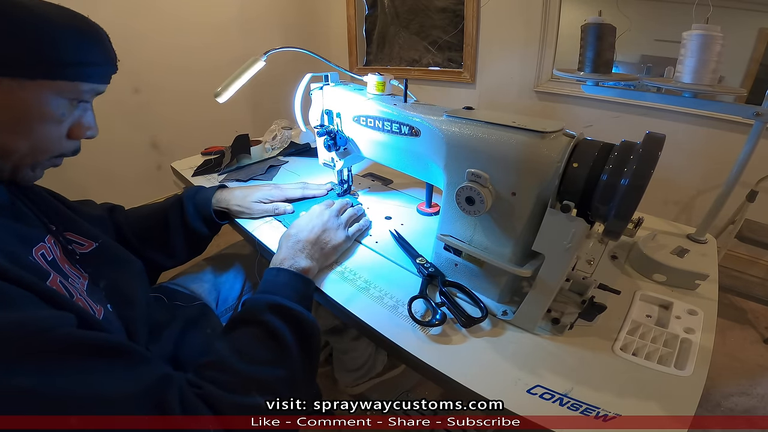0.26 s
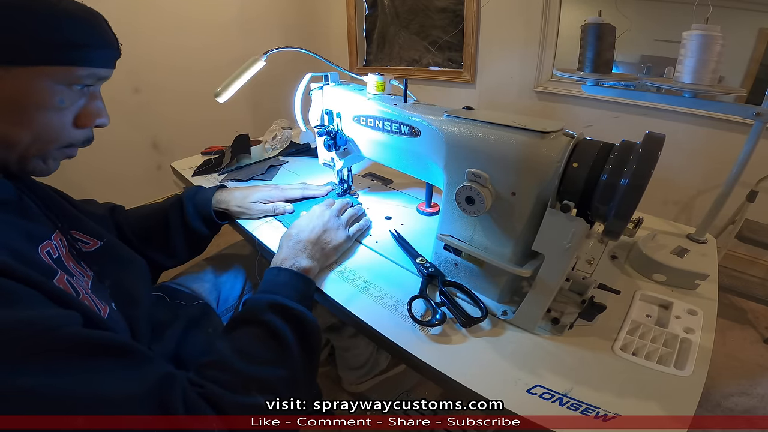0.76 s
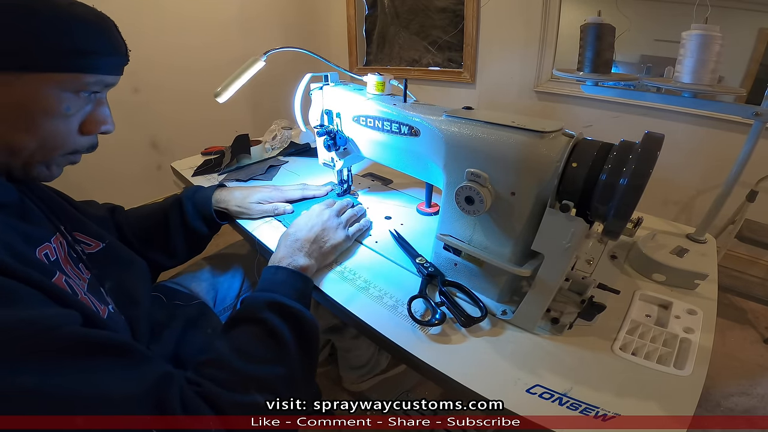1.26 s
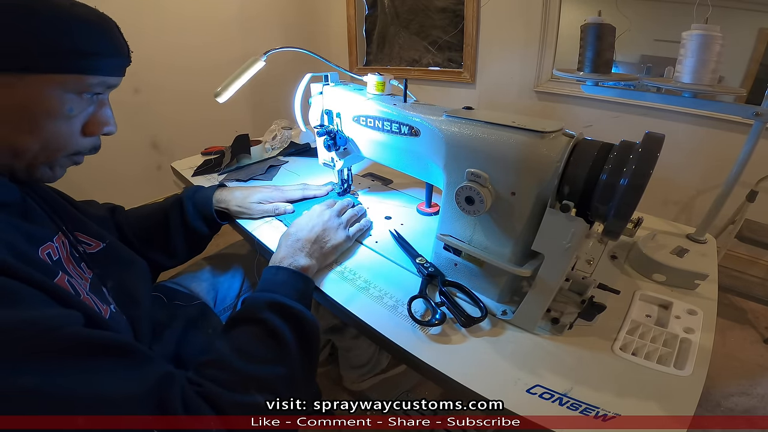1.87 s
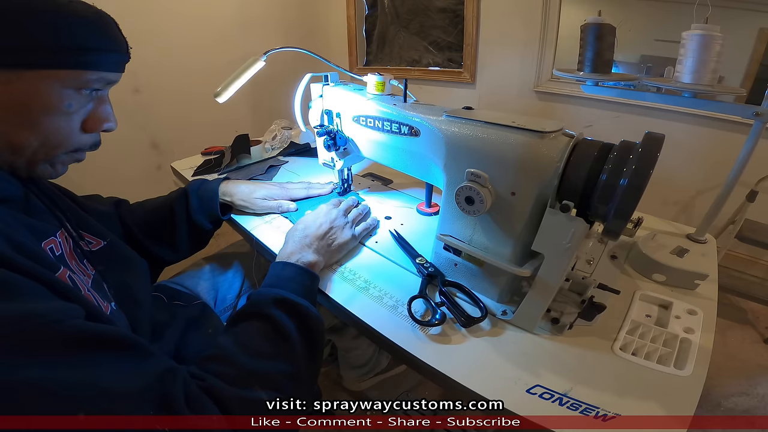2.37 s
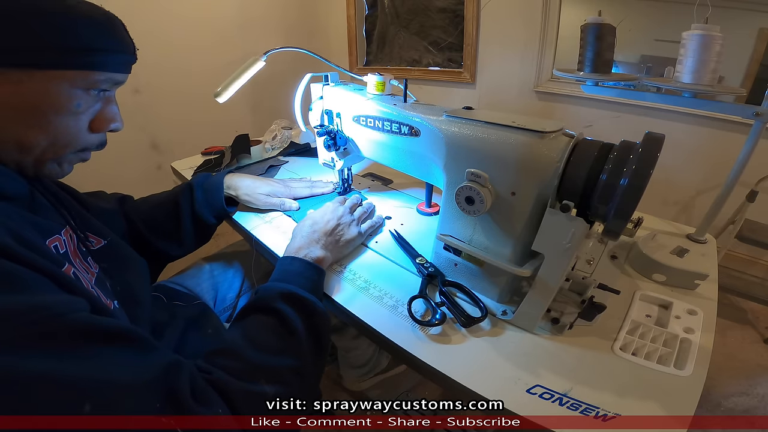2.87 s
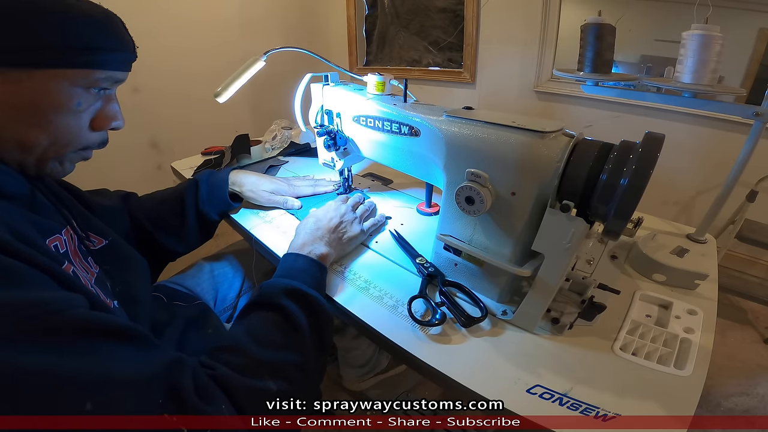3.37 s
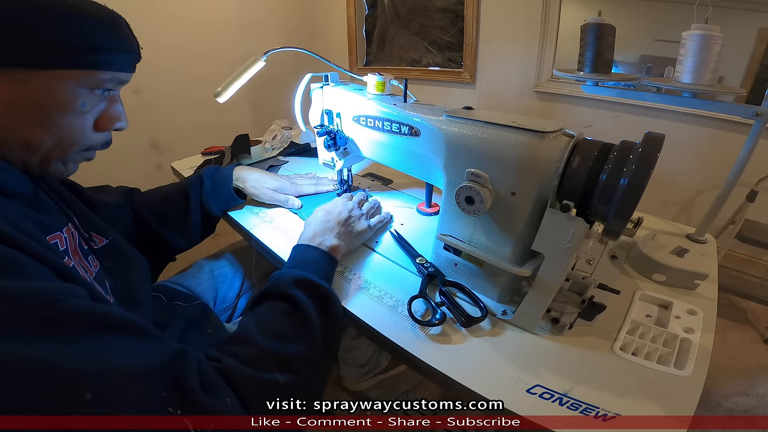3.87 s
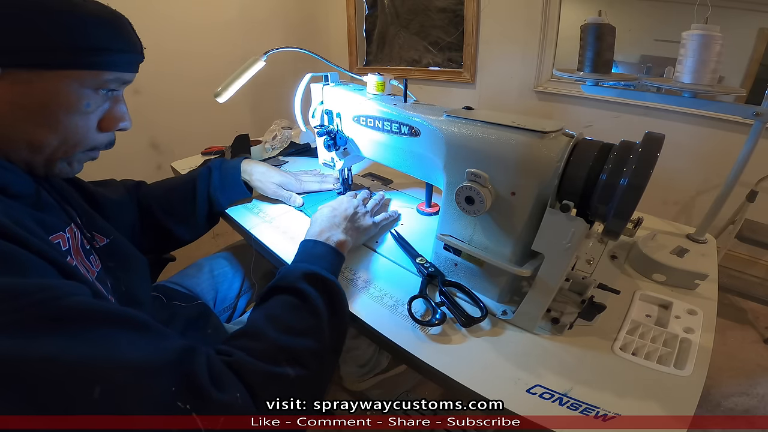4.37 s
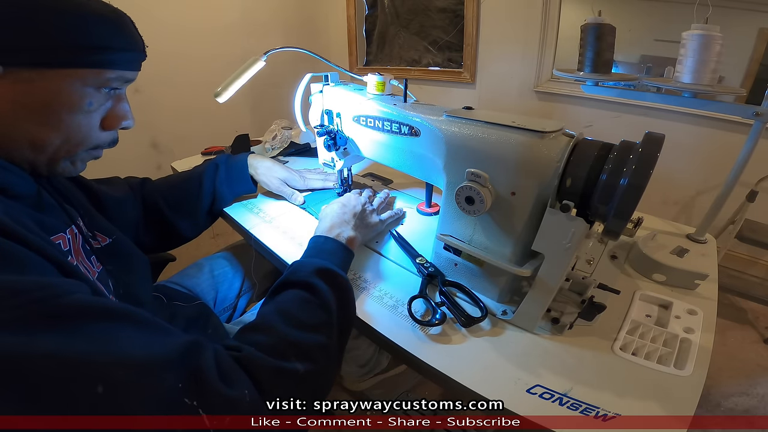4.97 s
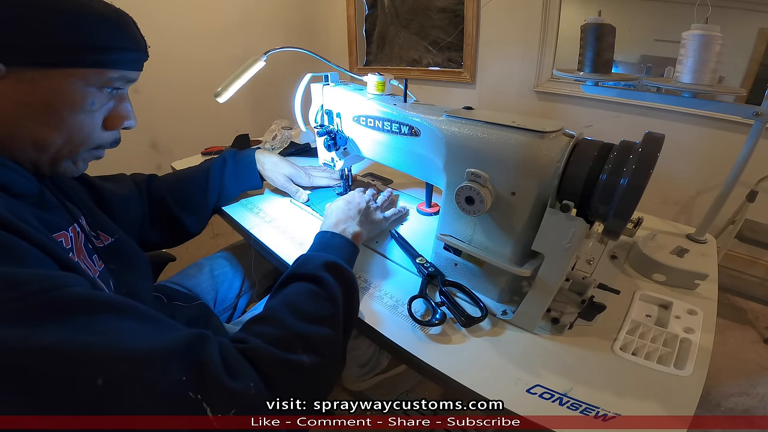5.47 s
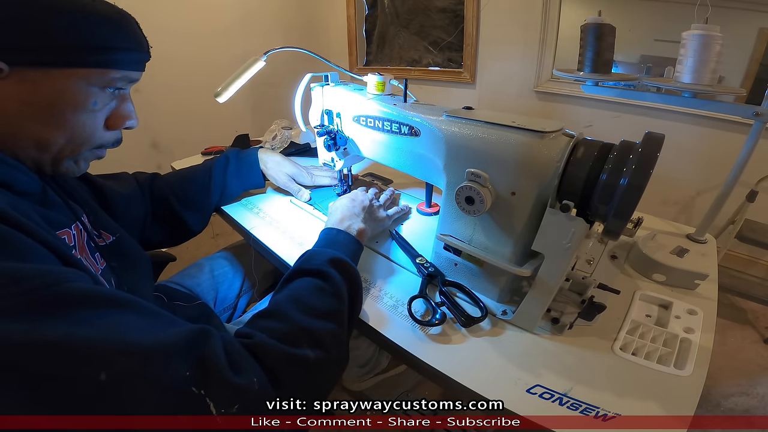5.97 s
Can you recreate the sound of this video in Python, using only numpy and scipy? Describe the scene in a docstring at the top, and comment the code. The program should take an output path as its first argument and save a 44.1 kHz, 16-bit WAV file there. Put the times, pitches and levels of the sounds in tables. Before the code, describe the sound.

Soft bumps and a metallic clack over a low motor hum, then an industrial sewing machine starts and clatters through twelve heavy, separate stitches.

```python
"""Industrial sewing machine

A walking-foot machine in a small room: the work is shifted with bumps, the presser foot drops with a clack,
then twelve stitches are sewn. Each turn of the shaft repeats its contacts: filtered noise bursts with decaying modes.
Coloured noise makes the whirr, the sliding cloth, the rocking stand and the low rumble.
A wavering sine makes the hum of the clutch motor, which drops in pitch as it takes up the load."""
import sys
import numpy as np
from scipy import signal
from scipy.fft import rfft, irfft, next_fast_len
from scipy.io import wavfile
from scipy.ndimage import uniform_filter1d, map_coordinates

SR = 44100
rng = np.random.default_rng(int(sys.argv[2]) if len(sys.argv) > 2 else 0)


def put_to_file(sound):
    """Save the sound as 16-bit audio at rate SR, in the file named by the first command-line argument."""
    columns = np.atleast_2d(sound).T  # one column per channel
    safe = np.clip(columns, -1, 1)
    whole_steps = np.round(safe * 32767)
    wavfile.write(sys.argv[1], SR, whole_steps.astype(np.int16))


N = 274743
NOW = np.arange(N) / SR  # time in the scene [s]
AGE = np.arange(SR * 2 // 5) / SR  # time since a blow [s]

START_S, STOP_S = 2.032, 6.3  # the shaft begins to turn; its twelfth turn ends
USUAL_PACE = 2.82  # turns per second
# where in a turn the parts meet [share of a turn after the click]
CLICK_AT, LANDING_AT, LOOP_AT, PUNCH_AT, KNOCK_AT = 0, .158, .305, .391, .555
# one row a stitch: (steel click time [s], foot landing time [s], feed knock time [s],
# needle punch level [dB], table thump level [dB])
STITCH_ROWS = [(2.104, 2.14, 2.224, -24, -33), (2.324, 2.36, 2.468, -26.5, -36),
               (2.593, 2.655, 2.849, -28, -39), (3.097, 3.159, 3.301, -26, -32.5),
               (3.464, 3.523, 3.662, -27, -33), (3.829, 3.888, 4.028, -32, -33.5),
               (4.191, 4.247, 4.386, -34, -36), (4.545, 4.603, 4.743, -30.5, -35),
               (4.899, 4.953, 5.093, -28, -38), (5.252, 5.307, 5.45, -25, -36),
               (5.602, 5.656, 5.796, -26, -33.5), (5.95, 6.004, 6.146, -27.5, -36)]


def shaft():
    """Kinematics: contact times give the turns of the shaft, and their slope its speed (1 at the usual pace)."""
    times = [START_S] + [s for row in STITCH_ROWS for s in row[:3]] + [STOP_S]
    marks = np.add.outer(np.arange(len(STITCH_ROWS)), [CLICK_AT, LANDING_AT, KNOCK_AT]).ravel()
    turns = np.interp(NOW, times, np.r_[-.3, marks, len(STITCH_ROWS)])
    turns_per_s = uniform_filter1d(np.gradient(turns) * SR, size=SR // 16)
    return turns, np.abs(turns_per_s) / USUAL_PACE


def stitching(turns, speed):
    """Superposition: the sounds of the stitch cycle add, all timed by one shaft."""
    contact_sound = steel_click(turns, speed) + foot_landing(turns, speed) + feed_knock(turns, speed)
    contact_sound += linkage_ticks(turns, speed) + thread_loop(turns, speed)
    contact_sound += thread_snaps(turns, speed) + needle_punch(turns)
    return contact_sound + table_thumps() + whirr(turns, speed) + thread_rasp()


# colour of the steel click: (frequency [Hz], level [dB per Hz])
CLICK_COLOUR = [(240, 0), (400, -20), (626, -8.5), (1090, -28), (1460, -44), (1600, -2), (1930, -6),
                (2430, 5.5), (3260, -15), (3580, -15), (5430, 1), (7400, -9), (9040, -5.5), (12100, -2.5),
                (16000, -17)]
# modes of the parts that click: (frequency [Hz], level [dB], t60 [s])
CLICK_MODES = [(1067, -5, 0.13), (2280, -3, 0.08), (6309, -6, 0.2), (9162, -3, .15), (9237, -1.5, 0.23),
               (10270, -1.5, 0.069), (11940, -9, .15)]


def steel_click(turns, speed):
    """Impact excitation: a bright contact sets off the modes of the struck parts."""
    clicks = each_turn(turns, speed, [(CLICK_AT, -24)], doubling_db=-0.5)
    blows = contacts(clicks, CLICK_COLOUR, t60=.055, room_db=-2.5, crack_db=7, gain_db=-10.5, alike=.75)
    return casting(blows) + ringing(clicks, CLICK_MODES, gain_db=-21.5, rise=.004)


# colour of the foot landing and the needle punch: (frequency [Hz], level [dB per Hz])
LANDING_COLOUR = [(150, -39), (250, -3), (444, 2.5), (607, -17), (710, -6), (1580, -0.5), (2280, -11),
                  (2530, -8), (3060, -5), (4050, -9), (5930, -16), (11500, -16.5), (16000, -31)]
# modes of the foot: (frequency [Hz], level [dB], t60 [s])
FOOT_MODES = [(443, 2, 0.12), (733, -1.5, 0.16), (1480, -9, 0.11), (1537, -6, 0.25), (2570, 4.5, 0.073),
              (4030, -18.5, 0.17), (6233, -9, .15)]
# modes of the table: (frequency [Hz], level [dB], t60 [s])
TABLE_MODES = [(70, -8, .4), (108, -4, .35), (126, -8, .3), (141, -8, .2), (167, 0, .38), (186, -6, .3),
               (241, -15, .3), (274, -13, .3), (322, -15, .3), (398, -17, .3), (414, -14, .3),
               (515, -15, .25)]


def foot_landing(turns, speed):
    """Coupled vibration: the landing foot rings and passes a share of its blow to the table."""
    landings = each_turn(turns, speed, [(LANDING_AT, -25)], doubling_db=3.2)
    blows = contacts(landings, LANDING_COLOUR, t60=.036, room_db=-1.5, crack_db=2.5, gain_db=-9.5, alike=.65)
    foot = ringing(landings, FOOT_MODES, gain_db=-19.5, rise=.006)
    return casting(blows) + foot + ringing(landings, TABLE_MODES, gain_db=-28.5, rise=0.017)


def table_thumps():
    """Modal response to a load: the table takes the weight of the foot a moment after the knock."""
    thumps = [(knock_s + 0.0112, thump_db) for _, _, knock_s, _, thump_db in STITCH_ROWS]
    return ringing(thumps, TABLE_MODES, gain_db=-0.5, rise=0.028)


# colour of the feed knock: (frequency [Hz], level [dB per Hz])
KNOCK_COLOUR = [(150, -21), (250, 9.5), (292, -1), (629, -7.5), (1530, 5), (1700, 2), (3060, -2),
                (4050, -5.5), (4410, -4), (7840, -12), (9330, -18), (11900, -14), (16000, -42)]
# modes of the feed: (frequency [Hz], level [dB], t60 [s])
FEED_MODES = [(870, -3, 0.16), (1384, 0, .15), (1429, -2, 0.17), (1550, 2, 0.29), (2056, -9, .15),
              (3580, -3.5, 0.12), (3840, -2.5, 0.16)]


def feed_knock(turns, speed):
    """Impact excitation: the feed knocks, much harder at higher speed."""
    knocks = each_turn(turns, speed, [(KNOCK_AT, -24.5)], doubling_db=9.5)
    blows = contacts(knocks, KNOCK_COLOUR, t60=.036, room_db=-1, crack_db=6, gain_db=-10, alike=.77)
    return casting(blows) + ringing(knocks, FEED_MODES, gain_db=-21.5, rise=.004)


# play in the linkage, taken up four times a turn: (place [share of a turn], level at the usual pace [dB])
LINKAGE_PLAY = [(.28, -23), (.473, -22), (.78, -27), (.967, -30)]
# colour of the linkage ticks, and of the clutch: (frequency [Hz], level [dB per Hz])
TICK_COLOUR = [(240, -28), (400, -9), (708, -11), (1900, 6.5), (2150, 2), (3310, -0.5), (4050, -8.5),
               (5350, -1.5), (6950, -10.5), (8110, -6), (8760, -17.5), (12100, -7), (16000, -27)]
# modes of the linkage: (frequency [Hz], level [dB], t60 [s])
LINKAGE_MODES = [(414.6, -2, 0.25), (2050, -7, 0.1), (2186, -0.5, 0.14), (2230, -3, 0.1), (2710, -3, .15),
                 (3300, -4, 0.11), (4650, -7, 0.22), (5440, -7, .15)]
# modes of the take-up spring: (frequency [Hz], level [dB], t60 [s])
SPRING_MODES = [(7971, -4, .2), (8014, -1, .24), (8110, -9, .1)]


def linkage_ticks(turns, speed):
    """Backlash: play taken up makes ticks, and each tick also rings the take-up spring."""
    ticks = each_turn(turns, speed, LINKAGE_PLAY, doubling_db=8.0)
    blows = contacts(ticks, TICK_COLOUR, t60=0.032, room_db=0.5, crack_db=-22.0, gain_db=-15.5, alike=0.51)
    linkage = ringing(ticks, LINKAGE_MODES, gain_db=-25.5, rise=.006)
    # the spring follows each tick by 0.41 dB per dB
    spring = ringing([(s, 0.41 * db) for s, db in ticks], SPRING_MODES, gain_db=-39, rise=.025)
    return casting(blows) + linkage + spring


# colour of the slipping loop: (frequency [Hz], level [dB per Hz])
LOOP_COLOUR = [(880, -25), (1500, -1), (1900, 0), (2230, -14), (3450, -16), (5490, -5.5), (7100, -7.5),
               (7840, -8), (10300, -12), (14200, -7), (16000, -35)]


def thread_loop(turns, speed):
    """Sudden release: the thread loop slips off the hook with a short burst of noise."""
    loops = each_turn(turns, speed, [(LOOP_AT, -27.5)], doubling_db=1)
    return casting(contacts(loops, LOOP_COLOUR, t60=.037, room_db=0, crack_db=0, gain_db=-10.5, alike=.5))


# lighter thread snaps: (place [share of a turn], level at the usual pace [dB])
THREAD_SNAPS = [(.572, -36), (.735, -42)]


def thread_snaps(turns, speed):
    """Sudden release: the thread snaps lightly, with the colour of the click and a very quick decay."""
    snaps = each_turn(turns, speed, THREAD_SNAPS, doubling_db=16)
    return casting(contacts(snaps, CLICK_COLOUR, t60=0.0077, room_db=-2.0, crack_db=-11.0, gain_db=-15.0, alike=0.66))


def needle_punch(turns):
    """Impact excitation: the needle punches once a stitch, with the colour of the landing."""
    punches = [(np.interp(k + PUNCH_AT, turns, NOW), db) for k, (*_, db, _) in enumerate(STITCH_ROWS)]
    return casting(contacts(punches, LANDING_COLOUR, t60=0.024, room_db=2.0, crack_db=0, gain_db=-10, alike=0.36))


# resonances of the machine body: (frequency [Hz], width [Hz], level [dB])
CASTING_MODES = [(414, 33, 2), (507, 15, -14), (730, 145, -3.5), (870, 55, -6.5), (1096, 20, -2.5),
                 (1290, 8.3, -4), (1412, 32, -7), (1548, 92, -10), (2100, 9.1, 2), (2770, 120, -12),
                 (3410, 19, 2), (9080, 91, 5), (10300, 160, 4)]


def casting(blows):
    """Resonant filtering: the cast body passes the blows and adds its band-pass resonances."""
    def body(f):
        response = 1
        for hz, width, db in CASTING_MODES:
            damping = 1j * f * width
            response = response + amp(db) * damping / (hz * hz - f * f + damping)
        return response
    return filtered(blows, body)


# sliding parts within a turn: (place [share of a turn], level [dB])
SLIDING_LEVEL = [(0, 5), (.08, 2), (.22, -3.5), (.32, 3.5), (.42, -1), (.53, 1), (.63, 0), (.75, -2),
                 (.9, -4.5), (1, 1)]
# colour of the running noise: (frequency [Hz], level [dB per Hz])
WHIRR_COLOUR = [(53, -30), (90, 2.5), (169, -0.5), (278, -21.5), (410, -10.5), (661, -16), (1570, -8.5),
                (1910, -15.5), (2650, -14), (4080, -18), (5410, -22.5), (7330, -22.5), (8000, -22.5),
                (12100, -28), (16000, -40)]


def whirr(turns, speed):
    """Friction noise: hook, bars and belt slide, louder and brighter with speed, swelling within each turn."""
    stroke_db = np.interp(turns % 1, *np.transpose(SLIDING_LEVEL))
    sizzle_colour = [(2000, -30), (5500, 0), (8000, 2), (11800, 2.0), (15000, -5), (16000, -20)]
    rattle = unit(amp(1.25 * wobble(330)) * noise(WHIRR_COLOUR, N))
    sizzle = unit(amp(5 * wobble(500)) * noise(sizzle_colour, N))
    # the treble grows with a steeper power of speed
    return amp(stroke_db) * (amp(-46.5) * speed ** 1.36 * rattle + amp(-60.5) * speed ** 2.4 * sizzle)


# thread rasps through the cloth: (middle [s], length [s], level [dB])
RASP_STROKES = [(3.868, 0.11, -47)]


def thread_rasp():
    """Friction noise: thread drawn through cloth gives a rough, bright swell."""
    colour = [(1000, -36), (4000, -4), (8000, -8), (11000, 14), (13000, 3), (16000, -15)]
    return swells(RASP_STROKES) * amp(3.7 * wobble(400)) * noise(colour, N)


# the presser foot drops and rattles: (time [s], level [dB])
DROP_BLOWS = [(1.163, -41), (1.171, -29), (1.184, -24.5), (1.191, -28.5)]
# colour of the clack: (frequency [Hz], level [dB per Hz])
CLACK_COLOUR = [(150, -61), (250, -40), (386, -13), (501, -27), (788, -2.5), (1310, -12.5), (1880, -18),
                (2810, -13), (3710, -17), (3910, -5), (4260, -23), (5630, -17), (7190, -24), (10000, -16),
                (16000, -40)]
# modes of the foot lifter: (frequency [Hz], level [dB], t60 [s])
LIFTER_MODES = [(390, -8, .2), (800, 2, .18), (900, 3, .22), (1050, -9, .5), (1577, -12, .33),
                (2035, -6, .16), (2223, -12, .3), (2767, -11, .33), (2910, -9, .33), (3553, -10, .35),
                (3910, -11, .25), (4000, -5, .25), (5610, -7, .35), (5744, -5, .42), (5830, -6, .38),
                (6697, -6, .42), (7600, -10, .25), (8382, -12, .25), (9900, -7, .28), (10150, -12, .35)]


def presser_drop():
    """Repeated impact: the presser foot drops and rattles; its second blow rings the lifter."""
    clack = contacts(DROP_BLOWS, CLACK_COLOUR, t60=0.088, room_db=-2.0, crack_db=-2, gain_db=-8.5, alike=0.058)
    return clack + ringing(DROP_BLOWS[1:2], LIFTER_MODES, gain_db=-14, rise=.05)


# bumps while the work is shifted, and last a thud as the clutch engages: (time [s], level [dB], treble against
# the mids [dB])
BUMP_BLOWS = [(0.039, -54.5, 4), (0.319, -57.5, -26), (0.485, -58, -18), (.526, -46, -29), (.763, -43, -12),
              (.792, -46, 1), (.809, -42.5, -2), (0.837, -54, 3), (1.96, -47, -14)]
# colour of the bumped bed: (frequency [Hz], level [dB per Hz])
BUMP_COLOUR = [(80, -3), (135, 1), (220, -11), (310, -0.5), (400, -6), (520, -14.5), (760, -11),
               (1100, -13), (2000, -14.5), (4000, -22.5), (9000, -27.5), (15000, -35)]
# modes of the bed: (frequency [Hz], level [dB], t60 [s])
BED_MODES = [(150, -3, .25), (309, 0, .3), (369, 0, .28), (396, -2, .28), (441, -3, .22), (503, -4, .22),
             (760, -9, .2)]


def work_bumps():
    """Impact excitation: bumps of differing brightness ring the bed and the table."""
    track = ringing(BUMP_BLOWS, BED_MODES, gain_db=-6.0, rise=0.012)
    track += ringing(BUMP_BLOWS, TABLE_MODES, gain_db=-11, rise=0.022)
    for s, db, treble_db in BUMP_BLOWS:
        tilt = [(900, 0), (4000, treble_db)]
        colour = [(hz, level + along(tilt, hz)) for hz, level in BUMP_COLOUR]
        add(track, s, amp(db + 2.0) * blow(colour, t60=0.075, room_db=1.5, crack_db=4))
    return track


# the clutch engages and the drive tightens: (time [s], level [dB])
CLUTCH_BLOWS = [(1.939, -41.5), (2.035, -36), (2.049, -24.5)]


def clutch():
    """Coupled vibration: the engaging clutch clicks and excites the table."""
    clicks = contacts(CLUTCH_BLOWS, TICK_COLOUR, t60=.03, room_db=-11, crack_db=-6, gain_db=-11, alike=0.36)
    return clicks + ringing(CLUTCH_BLOWS, TABLE_MODES, gain_db=-17, rise=0.02)


# cloth slides on the bed: (middle [s], length [s], level [dB])
CLOTH_STROKES = [(.72, 0.35, -67.5), (1.42, 0.32, -65.5), (1.82, 0.4, -65)]


def cloth_slides():
    """Friction noise: cloth on the bed gives soft, uneven noise that swells and fades."""
    colour = [(300, -27), (1200, -2.5), (2800, 1), (5000, -11), (14000, -20.0)]
    return swells(CLOTH_STROKES) * amp(3.1 * wobble(29.55)) * noise(colour, N)


# level of the motor hum before load and flutter: (time [s], level [dB])
HUM_LEVEL = [(0, -55), (.7, -47.5), (1.0, -43.5), (1.4, -49.5), (3.0, -50), (5.0, -45), (6.2, -51)]


def motor_hum():
    """Frequency modulation: the motor's sine sags in pitch and swells as the clutch takes up the load."""
    load = swell(middle=2.3, length=0.338)
    hz = 70.4 - 6.63 * load
    phase = 2 * np.pi * np.cumsum(hz) / SR + 1.2 * wobble(5.6)
    level_db = curve(HUM_LEVEL) + 15.5 * load + 2.2 * wobble(9.4)
    return amp(level_db) * np.sin(phase)


# leaning on the table rocks the stand: (middle [s], length [s], level [dB])
LEANING_STROKES = [(.55, 0.12, -28.5), (.89, 0.21, -26.5)]
# colour of the rocking stand: (frequency [Hz], level [dB per Hz])
SHAKE_COLOUR = [(12, -20), (21, -14.5), (25, -4), (30, -2.5), (38, -29), (55, -22), (90, -48), (200, -87)]


def rocking_stand(turns, speed):
    """Forced vibration: leaning rocks the stand, and the running machine rocks it more with every turn."""
    sway = speed * amp(-44 + 0.6 * turns)
    return (swells(LEANING_STROKES) + sway) * noise(SHAKE_COLOUR, N)


# colour of the deep rumble: (frequency [Hz], level [dB per Hz])
RUMBLE_COLOUR = [(4, -27), (9, -5), (14, 13), (20, -13.5), (30, -5), (40, -19.5), (55, -21), (100, -36),
                 (200, -77), (400, -71)]
# colour of the room's faint hiss: (frequency [Hz], level [dB per Hz])
AIR_COLOUR = [(53, -60), (90, 2), (210, -13), (272, -13.5), (467, -25), (556, -24.5), (606, -24.5),
              (1090, -29), (1290, -32.5), (1410, -30.5), (4960, -36.5), (11100, -37), (16000, -43)]


def room_noise():
    """Stationary random noise: a deep rumble and the room's faint hiss."""
    return amp(-35) * noise(RUMBLE_COLOUR, N) + amp(-54.5) * noise(AIR_COLOUR, N)


def each_turn(turns, speed, places, doubling_db):
    """Periodicity: (time [s], level [dB]) of contacts on the shaft, changed by doubling_db at twice the speed."""
    rows = []
    for k in range(-1, len(STITCH_ROWS)):
        for share, db in places:
            if turns[0] < k + share < turns[-1]:
                s = np.interp(k + share, turns, NOW)
                pace_db = doubling_db * np.log2(speed[int(s * SR)] + .001)
                scatter_db = 1.32 * rng.standard_normal()  # from one turn to the next
                rows.append((s, db + pace_db + scatter_db))
    return rows


def contacts(rows, spectrum, t60, room_db, crack_db, gain_db, alike):
    """Partial coherence: the same parts meet again, so a share (alike) of each blow's power repeats."""
    track, own = np.zeros(N), blow(spectrum, t60, room_db, crack_db)
    for s, db, *_ in rows:
        fresh = blow(spectrum, t60, room_db, crack_db)
        add(track, s, amp(db + gain_db) * (np.sqrt(alike) * own + np.sqrt(1 - alike) * fresh))
    return track


# decay of the room: (frequency [Hz], t60 [s])
ROOM_DECAY = [(150, 0.54), (1000, 0.41), (4000, 0.4), (9000, 0.29), (15000, 0.24)]


def blow(spectrum, t60, room_db, crack_db):
    """Reverberation: a crack and a dense, damped ring are convolved with decaying noise for the room."""
    hz, t, bins = signal.stft(rng.standard_normal(len(AGE)), SR, nperseg=256)
    decay = np.exp(-np.log(1000) * t / along(ROOM_DECAY, hz)[:, None])
    room = signal.istft(bins * decay, SR, nperseg=256)[1][:len(AGE)]
    room = room * (1 - fade(0.018))  # the room builds up gradually
    envelope = (fade(t60) + amp(crack_db) * fade(0.0059)) * (1 - fade(0.0032))
    direct = noise(spectrum, len(AGE)) * envelope
    tail = signal.fftconvolve(direct, room / np.linalg.norm(room))[:len(AGE)]
    return direct + amp(room_db) * tail


def ringing(rows, modes, gain_db, rise):
    """Modal superposition: every blow strikes the damped modes at slightly new strengths."""
    track = np.zeros(N)
    shapes = np.array([amp(db) * fade(t60) * np.sin(2 * np.pi * hz * AGE) for hz, db, t60 in modes])
    shapes = shapes * (1 - fade(rise))
    for s, db, *_ in rows:
        strengths = amp(db + gain_db + 2 * rng.standard_normal(len(modes)))
        add(track, s, strengths @ shapes)
    return track


def swell(middle, length):
    """Cosine envelope: a smooth rise and fall, 1 at its middle."""
    return np.cos(np.pi / 2 * np.clip(2 * (NOW - middle) / length, -1, 1))


def swells(rows):
    """Superposed envelopes: the gain of (middle [s], length [s], level [dB]) strokes."""
    return sum(amp(db) * swell(s, length) for s, length, db in rows)


def amp(db):
    """Logarithmic level: decibels to gain."""
    return 10 ** (np.asarray(db) / 20)


def fade(t60):
    """Exponential damping: a decay of 60 dB in t60 seconds."""
    return np.exp(-np.log(1000) * AGE / t60)


def unit(x):
    """Normalization: scaled to rms 1."""
    return x / np.sqrt(np.mean(x ** 2) + 1e-20)


def along(points, hz):
    """Logarithmic frequency scale: (frequency [Hz], value) points joined on a log axis."""
    f, v = np.transpose(points)
    return np.interp(np.log(hz + 1), np.log(f + 1), v)


def curve(rows):
    """Linear interpolation: (time [s], value) rows joined by lines."""
    return np.interp(NOW, *np.transpose(rows))


def wobble(rate):
    """Band-limited fluctuation: a smooth random curve with rate knots a second."""
    return map_coordinates(rng.standard_normal(int(N * rate / SR) + 4), [NOW * rate])


def filtered(x, response):
    """Linear filtering: the spectrum of x times a response of frequency [Hz]."""
    m = next_fast_len(len(x) + SR // 4)
    return irfft(rfft(x, m) * response(np.fft.rfftfreq(m, 1 / SR)), m)[:len(x)]


def noise(spectrum, size):
    """Spectral shaping: white noise coloured by the spectrum, at rms 1."""
    gain = amp(along(spectrum, np.fft.rfftfreq(size, 1 / SR)))
    return unit(irfft(rfft(rng.standard_normal(size)) * gain, size))


def add(track, s, sound):
    """Superposition: mix a sound into the track at s seconds."""
    part = track[max(round(s * SR), 0):][:len(sound)]
    part += sound[:len(part)]


def scene():
    """Superposition: all sources add to the same sound in both ears."""
    turns, speed = shaft()
    handling = presser_drop() + work_bumps() + clutch() + cloth_slides()
    background = motor_hum() + rocking_stand(turns, speed) + room_noise()
    return np.tile(stitching(turns, speed) + handling + background, (2, 1))


def record(dry):
    """Band limiting: each channel adds its own faint hiss, and nothing is kept from 15900 Hz up."""
    hiss = [(60, -3), (400, 1), (1500, -12.0), (4000, -3), (12000, 1.0), (16000, 6)]
    return np.array([filtered(side + amp(-76) * noise(hiss, N), lambda hz: hz < 15900) for side in dry])


dry = scene()
out = record(dry)
put_to_file(out)
```